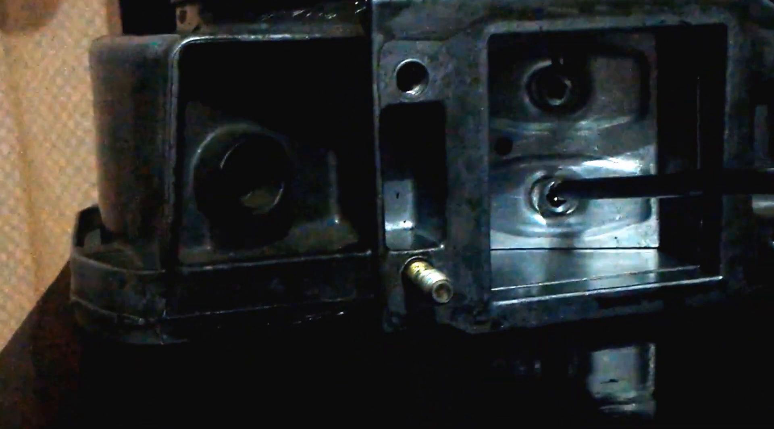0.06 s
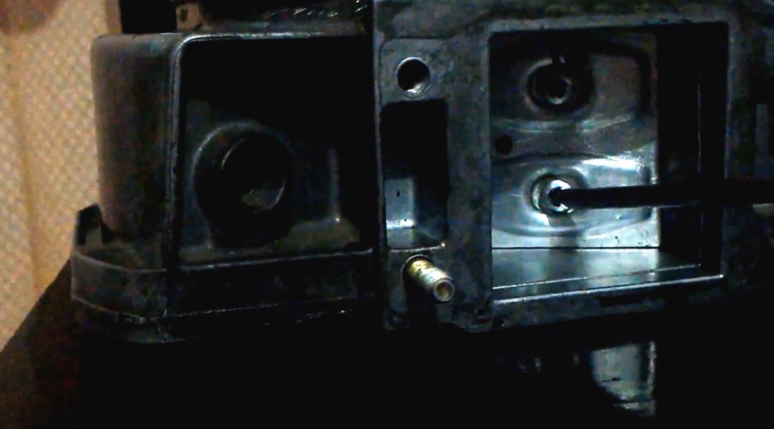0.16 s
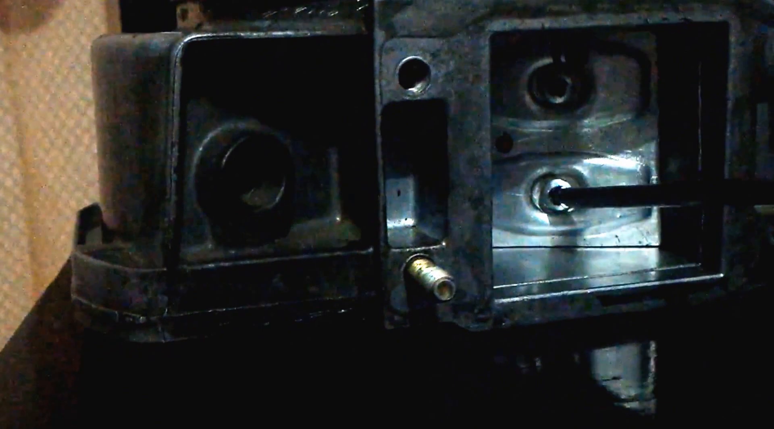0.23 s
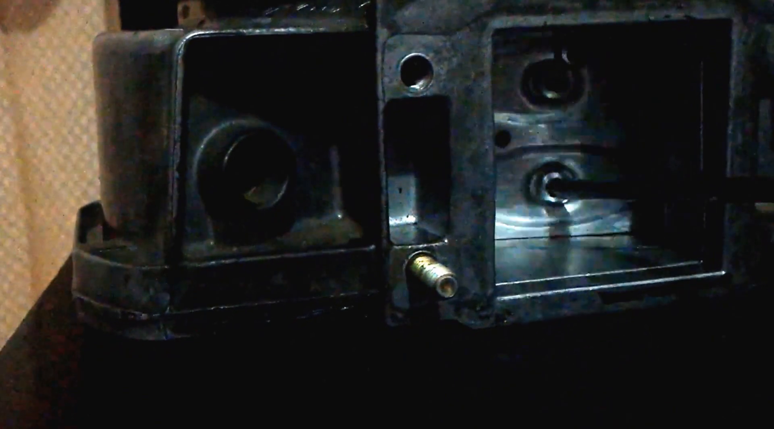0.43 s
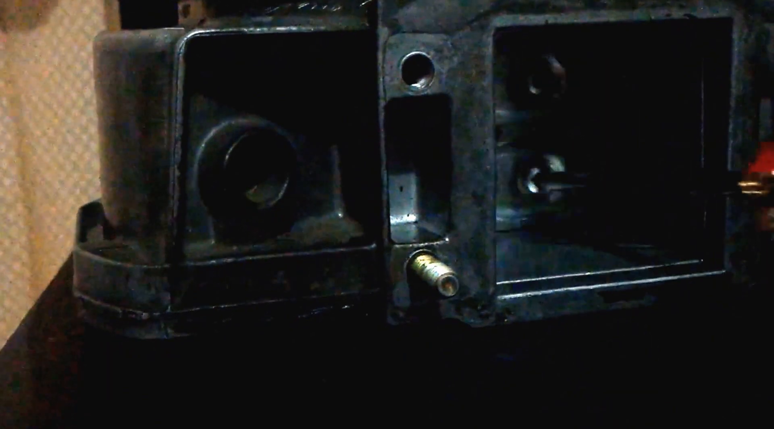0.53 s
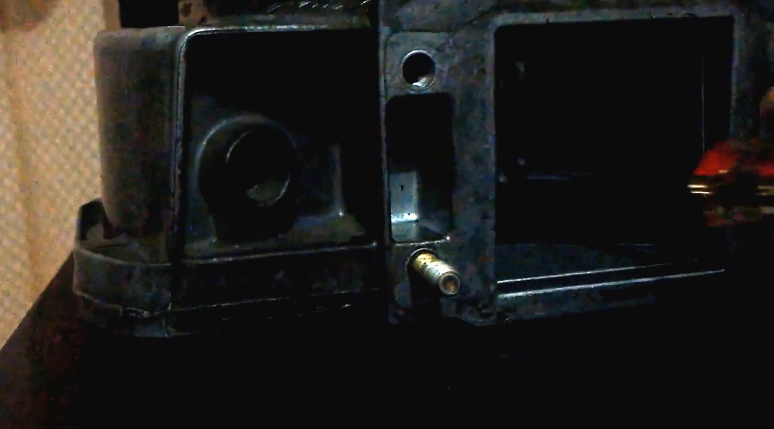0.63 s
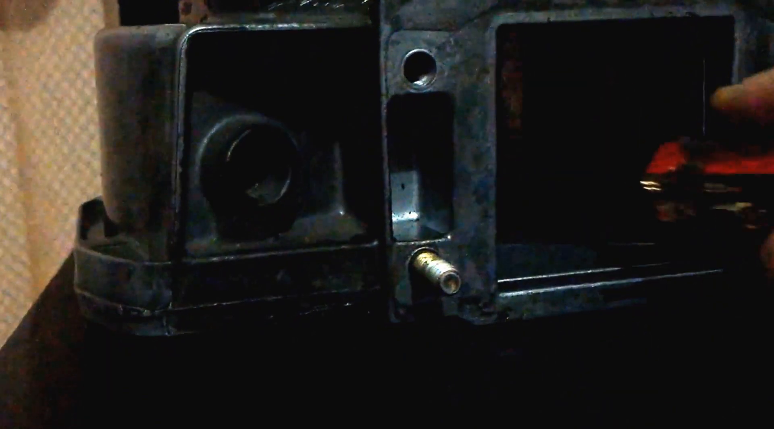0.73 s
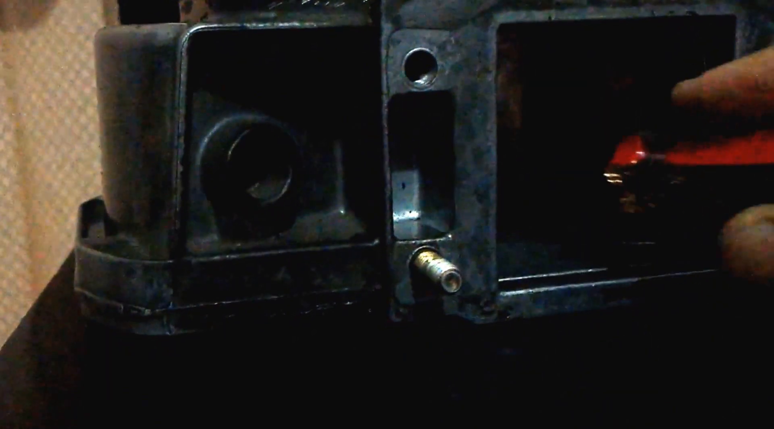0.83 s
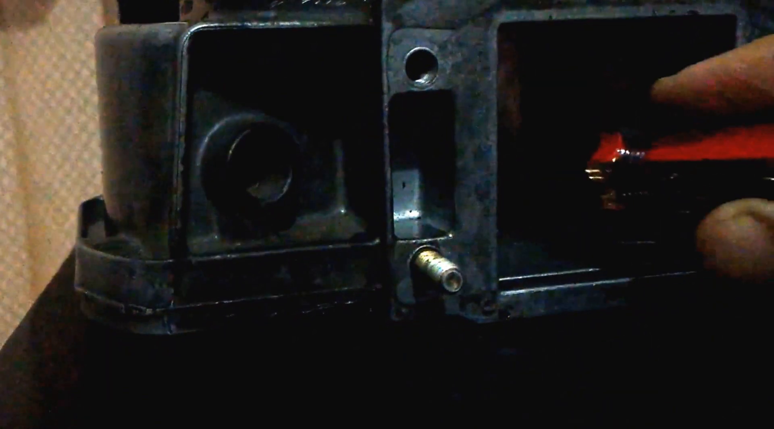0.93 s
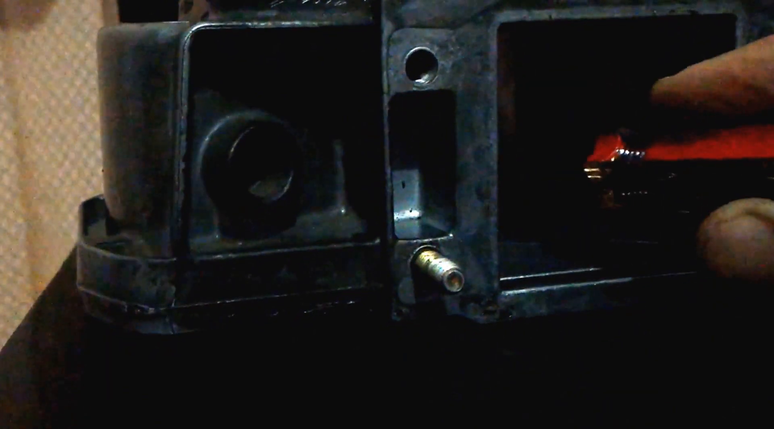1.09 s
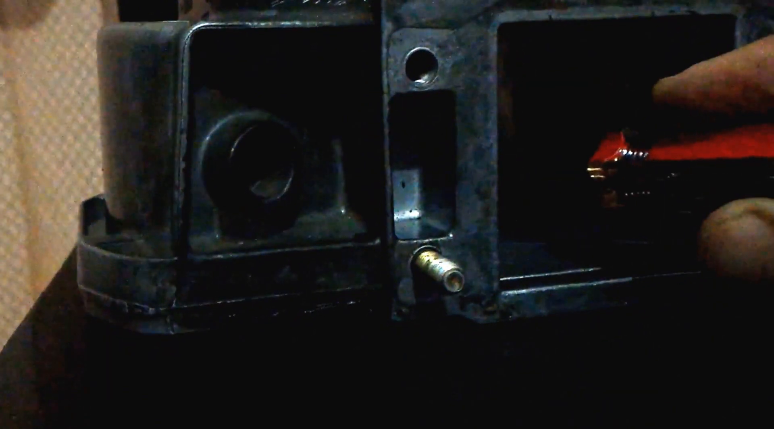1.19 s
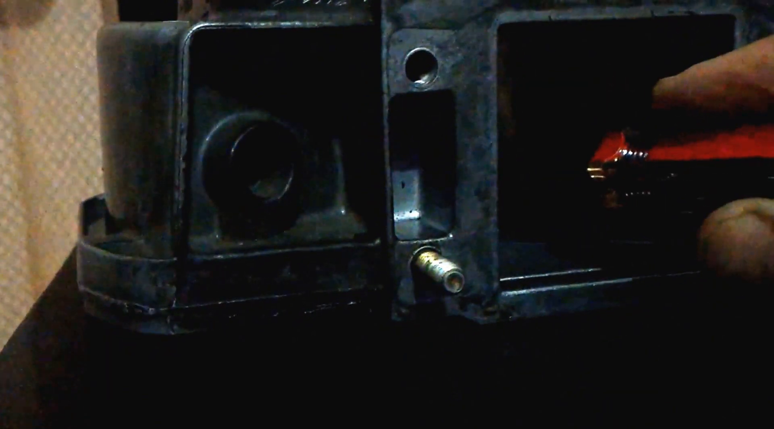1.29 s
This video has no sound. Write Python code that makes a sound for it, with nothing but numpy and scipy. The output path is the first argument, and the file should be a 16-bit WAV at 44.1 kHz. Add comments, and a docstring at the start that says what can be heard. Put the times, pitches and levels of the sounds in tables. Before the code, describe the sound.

A metal flap snaps shut with a sharp clack after a brief screwdriver scrape.

```python
"""A sprung metal flap in a cast housing, worked with a screwdriver close to the microphone.
The blade scrapes, squeaks and ticks along the flap, then slips off, and the flap snaps shut in a quick
chatter of contacts with a brief ring. The shaft slides out with a faint hiss and the handled tool knocks
dully. A small quiet workshop answers. Underneath lie the rub of a hand on the housing, hiss, rumble,
a faint low drone and a thin electrical whine."""
import sys
import numpy as np
from scipy import signal
from scipy.fft import rfft, irfft, next_fast_len
from scipy.io import wavfile
from scipy.ndimage import map_coordinates

SR = 44100
rng = np.random.default_rng(int(sys.argv[2]) if len(sys.argv) > 2 else 0)


def output_pcm(signal):
    """Save a mono or channel-first signal as 16-bit PCM at the path in sys.argv[1].

    Samples are clipped to [-1, 1] before scaling.
    """
    pcm = np.clip(np.atleast_2d(signal).T, -1, 1) * 32767
    wavfile.write(sys.argv[1], SR, np.round(pcm).astype(np.int16))


N = 59535

# Modes of flap and housing. Each row: frequency in Hz, clack gain in dB, clack T60 in seconds,
# gain of the lingering ring in dB.
FLAP_MODES = [(365, -26.5, 0.073, -51), (488, -24, 0.025, -54), (724, -26, 0.086, -46.5),
              (834, -16.5, 0.016, -55), (1101, -4.5, 0.016, -44.5), (1239.4, -5, 0.031, -36.5),
              (1759, -5.5, 0.021, -36), (1889, -4.5, 0.019, -31), (2052, -7, 0.027, -42),
              (2418, -22.5, .04, -39), (4080, -10, .018, -50), (4407, -12, 0.011, -53.5),
              (5566, -8.5, .025, -47), (5714, -7.5, .03, -43)]
# The blade's scrape. Each row: time in seconds, level in dB.
SCRAPE_LEVEL = [(0, -72), (.025, -50), (.06, -46.5), (.13, -45), (.2, -42), (.225, -70), (.5, -72),
                (.6, -68), (.75, -71), (.9, -66.5), (1.0, -79.5)]
# Its tone. Each row: frequency in Hz, relative gain in dB.
SCRAPE_EQ = [(60, 6.5), (200, 3.5), (310, 10.5), (400, -1), (540, -4.5), (680, 15), (850, 11.5),
             (1100, -4.5), (1450, 3), (1900, -11.5), (3000, -8), (4300, -20.5), (5600, -21), (7000, -16.5)]
# The hand on the housing. Each row: time in seconds, level in dB.
RUB_LEVEL = [(0, -70), (.05, -60), (.2, -60.5), (.26, -66), (.4, -78.5)]
# Its tone. Each row: frequency in Hz, relative level in dB.
RUB_SPECTRUM = [(25, -0.5), (55, 4), (100, -3.5), (300, -4), (420, -14), (1000, -50)]
# The room's hiss and rumble. Each row: frequency in Hz, relative level in dB.
AIR_SPECTRUM = [(25, -1.5), (50, 4.5), (80, -7.5), (130, -8.5), (300, -15), (550, -16), (1100, -20),
                (2000, -21.5), (4000, -25.5), (7000, -29), (10000, -24), (15000, -18)]
# The low drone. Each row: time in seconds, level in dB.
DRONE_LEVEL = [(0, -72.5), (.6, -71), (.76, -70), (.95, -73), (1.2, -88)]
# The electrical whine. Each row: time in seconds, level in dB.
WHINE_LEVEL = [(0, -41), (.155, -45), (.23, -50), (.28, -61), (.38, -72), (.45, -53), (.53, -71), (.6, -61),
               (.95, -71), (1.35, -65)]
# Its drift. Each row: time in seconds, pitch in Hz.
WHINE_DRIFT = [(.155, 15624), (.18, 15735), (.95, 15707), (1.1, 15635)]
# The blade gripping. Each row: start in seconds, length in seconds, level in dB.
BLADE_SQUEAKS = [(0.031, .016, -54.5), (0.055, .012, -52), (0.109, .011, -54.5), (0.122, .007, -51.5),
                 (0.129, .008, -48.5), (0.155, .02, -56)]
# The flap's ticks and snap. Each row: start in seconds, gain in dB, treble cutoff in Hz,
# relative gain of the crack in dB.
FLAP_CONTACTS = [(.0358, -20.5, 1400, -12), (0.0555, -38, 3000, -20.5), (0.1232, -27.5, 2200, -12),
                 (0.1682, -33.5, 1500, -11.5), (0.207, -31, 1500, -15.5), (0.2111, -15, 3000, -5),
                 (0.2206, -6, 9000, -8), (.2233, -16.5, 7000, 1.5), (.2260, -24, 7000, 1.5),
                 (0.569, -45, 1800, -7)]
# The noise of a hard contact. Each row: frequency in Hz, relative level in dB.
CRACK_SPECTRUM = [(300, -15), (1100, -6), (1900, -1), (2900, -3), (4200, -4), (5300, 3), (6500, -4.5),
                  (10000, -4), (12500, -5), (15000, -14)]
# The shaft sliding out. Each row: time in seconds, level in dB.
SLIDE_LEVEL = [(.5, -86), (.63, -67.5), (.72, -74.5), (.8, -69.5), (.88, -108)]
# Its resonances. Each row: centre in Hz, half-width in Hz, relative level in dB.
SLIDE_RESONANCES = [(4050, 250, -3), (5750, 160, 1.5), (7655, 200, -1.5)]
# The tool being handled. Each row: start in seconds, gain in dB, treble cutoff in Hz, pitch ratio.
TOOL_KNOCKS = [(0.866, -45.5, 5040, 1.03), (.941, -35.5, 900, .9), (.959, -46.5, 700, 0.66),
               (.9952, -26, 2200, 1.03), (1.0108, -23, 2200, 0.978), (1.025, -40.5, 800, 0.758),
               (1.040, -53, 1200, 0.91)]
# Modes of its handle. Each row: frequency in Hz, gain in dB, T60 in seconds.
HANDLE_MODES = [(430, -23.5, .04), (660, -11, .025), (858, -8.5, 0.027), (1048, 1, 0.038),
                (1287, -1, 0.015), (1800, -21, .03), (2200, -25.5, 0.04), (2960, -21.5, 0.038),
                (3740, -21.5, 0.026), (4250, -17.5, 0.038)]
# Echoes off near surfaces. Each row: delay in seconds, gain in dB.
NEAR_ECHOES = [(.0045, -20.5), (.008, -18.5), (0.0144, -20.5), (0.0202, -25), (.037, -26.5)]
# The workshop's tail. Each row: frequency in Hz, T60 in seconds.
TAIL_DECAY = [(200, 0.55), (700, .48), (2000, 0.5), (5500, 0.57), (9000, 0.5), (15000, 0.24)]
# Its tone. Each row: frequency in Hz, gain in dB.
TAIL_EQ = [(150, 6.5), (380, 7), (700, 10), (1100, -3.5), (1500, -5.5), (1900, 0), (3000, -2), (4200, -9.5),
           (5200, -5), (6500, -8.5), (9500, -2), (14000, -6)]


def amp(db):
    """Decibels to gain."""
    return 10 ** (np.asarray(db) / 20)


def unit(x):
    """Scale to rms 1."""
    return x / np.sqrt(np.mean(x ** 2) + 1e-20)


def along(points, hz):
    """Read (Hz, value) points on a log frequency axis."""
    freqs, values = np.transpose(points)
    return np.interp(np.log(hz + 1), np.log(freqs + 1), values)


def curve(points):
    """Join (seconds, value) points, one value a sample."""
    return np.interp(np.arange(N) / SR, *np.transpose(points))


def wobble(rate):
    """A smooth random curve, rate knots a second."""
    return map_coordinates(rng.standard_normal(int(N * rate / SR) + 4), [np.arange(N) * rate / SR])


def filtered(x, response):
    """Shape x with a gain that depends on frequency."""
    size = next_fast_len(N + SR // 2)
    return irfft(rfft(x, size) * response(np.fft.rfftfreq(size, 1 / SR)), size)[:N]


def noise(spectrum):
    """Coloured noise of rms 1."""
    return unit(filtered(rng.standard_normal(N), lambda hz: amp(along(spectrum, hz))))


def band(centre_hz, half_width_hz):
    """Noise of rms 1 in one resonance."""
    white = rng.standard_normal(N)
    return unit(filtered(white, lambda hz: 1 / (1 + ((hz - centre_hz) / half_width_hz) ** 2)))


def fade(t60):
    """Exponential decay, 60 dB in t60 seconds."""
    return amp(-60 * np.arange(N) / SR / t60)


def ring(modes):
    """Damped sines of alternating sign from (Hz, dB, T60) rows."""
    t = np.arange(N) / SR
    return sum((-1) ** k * amp(db) * fade(t60) * np.sin(2 * np.pi * hz * t)
               for k, (hz, db, t60) in enumerate(modes))


def strike(sound, start, db, cutoff_hz):
    """Place a blow in time; a softer contact loses its treble."""
    lowpass = signal.butter(1, cutoff_hz, fs=SR, output="sos")
    return amp(db) * np.pad(signal.sosfilt(lowpass, sound), (round(start * SR), 0))[:N]


def clack():
    """The flap's fast, well damped answer to a tap."""
    return ring([(hz, db, t60) for hz, db, t60, _ in FLAP_MODES])


def blade_scrape(slips_per_s=900, spread_db=12.5):
    """Tiny random slips of the blade each excite the flap."""
    slips = (rng.random(N) < slips_per_s / SR) * amp(spread_db * rng.standard_normal(N))
    metal = signal.fftconvolve(slips - slips.mean(), clack())[:N]
    scrape = filtered(metal, lambda hz: amp(along(SCRAPE_EQ, hz)))
    return unit(scrape) * amp(curve(SCRAPE_LEVEL))


def hand_rub():
    """The hand rubs the housing, soft and low, while the blade is worked."""
    return noise(RUB_SPECTRUM) * amp(curve(RUB_LEVEL))


def room_tone(air_db=-58):
    """Steady hiss and rumble with a faint low drone."""
    drone = amp(curve(DRONE_LEVEL)) * band(centre_hz=375, half_width_hz=30)
    return amp(air_db) * noise(AIR_SPECTRUM) + drone


def electrical_whine(waver_hz=5, waver_db=2):
    """One thin, very high tone, wavering in pitch and level."""
    pitch_hz = curve(WHINE_DRIFT) + waver_hz * wobble(100)
    level_db = curve(WHINE_LEVEL) + waver_db * wobble(70)
    return amp(level_db) * unit(np.sin(2 * np.pi * np.cumsum(pitch_hz) / SR))


def blade_squeaks(mode_hz=5600, waver_hz=70):
    """Where the blade grips, it sings briefly on one high mode."""
    t = np.arange(N) / SR
    swells = sum(amp(db) * np.sin(np.pi * np.clip((t - start) / length, 0, 1))
                 for start, length, db in BLADE_SQUEAKS)
    pitch_hz = mode_hz + waver_hz * wobble(170)
    return swells * unit(np.sin(2 * np.pi * np.cumsum(pitch_hz) / SR))


def flap_contacts(ring_gain_db=-7.5, ring_t60=0.37, crack_t60=0.024):
    """Each contact gives a clack, a short crack and the housing's weaker, longer ring."""
    housing = ring([(hz, db, ring_t60) for hz, _, _, db in FLAP_MODES])
    body = clack() + amp(ring_gain_db) * housing
    contacts = np.zeros(N)
    for start, db, cutoff_hz, crack_db in FLAP_CONTACTS:
        crack = amp(crack_db) * noise(CRACK_SPECTRUM) * fade(crack_t60)
        contacts += strike(body + crack, start, db, cutoff_hz)
    return contacts


def shaft_slide():
    """The shaft hisses faintly in narrow bands as it is drawn out."""
    hiss = sum(amp(db) * band(hz, half_width) for hz, half_width, db in SLIDE_RESONANCES)
    return unit(hiss) * amp(curve(SLIDE_LEVEL))


def tool_knocks(attack_s=0.0007, tick_gain_db=-15.5, tick_t60=0.02):
    """Dull knocks of the handle, each with a faint tick; the grip shifts their pitch."""
    onset = 1 - np.exp(-np.arange(N) / SR / attack_s)
    knocks = np.zeros(N)
    for start, db, cutoff_hz, ratio in TOOL_KNOCKS:
        body = onset * ring([(hz * ratio, mode_db, t60) for hz, mode_db, t60 in HANDLE_MODES])
        tick = amp(tick_gain_db) * noise(CRACK_SPECTRUM) * fade(tick_t60)
        knocks += strike(body + tick, start, db, cutoff_hz)
    return knocks


def workshop(direct, tail_gain_db=-9.5, build_up_s=0.008):
    """The direct sound reaches the microphone first, then near echoes and a diffuse tail."""
    freqs, times, spectra = signal.stft(rng.standard_normal(N), SR, nperseg=256)
    decay = amp(-60 * times / along(TAIL_DECAY, freqs)[:, None])
    tail = signal.istft(spectra * decay, SR, nperseg=256)[1][:N]
    tail = filtered(tail / np.linalg.norm(tail), lambda hz: amp(along(TAIL_EQ, hz)))
    tail *= np.minimum(np.arange(N) / SR / build_up_s, 1) ** 2
    echoes = sum(amp(db) * np.pad(direct, (round(delay * SR), 0))[:N] for delay, db in NEAR_ECHOES)
    return direct + echoes + amp(tail_gain_db) * signal.fftconvolve(direct, tail)[:N]


def scene():
    """Flap and tool close by in the workshop, over its room tone, in mono."""
    metal = workshop(flap_contacts() + blade_scrape() + shaft_slide() + blade_squeaks())
    handling = workshop(tool_knocks()) + hand_rub()
    return (metal + handling + electrical_whine() + room_tone())[None]


def record(dry, top_hz=16000):
    """The microphone keeps nothing above its band limit."""
    return filtered(dry[0], lambda hz: 1 / np.sqrt(1 + (hz / top_hz) ** 200))[None]


dry = scene()
out = record(dry)
output_pcm(out)
```